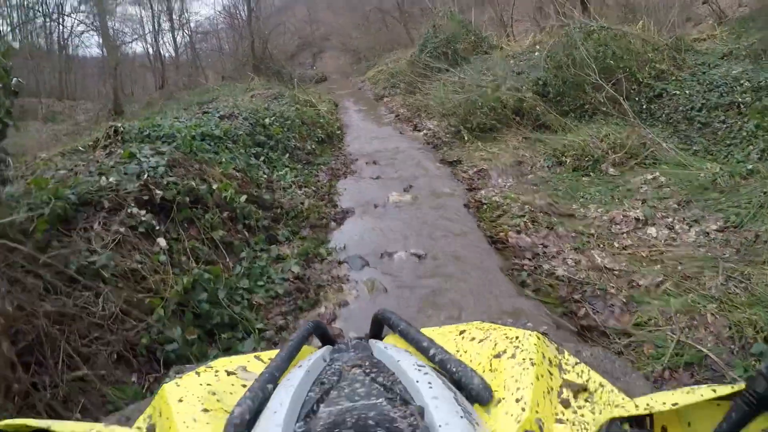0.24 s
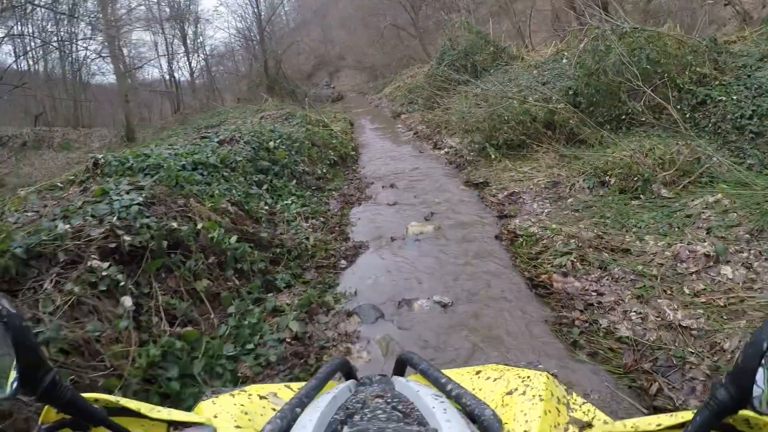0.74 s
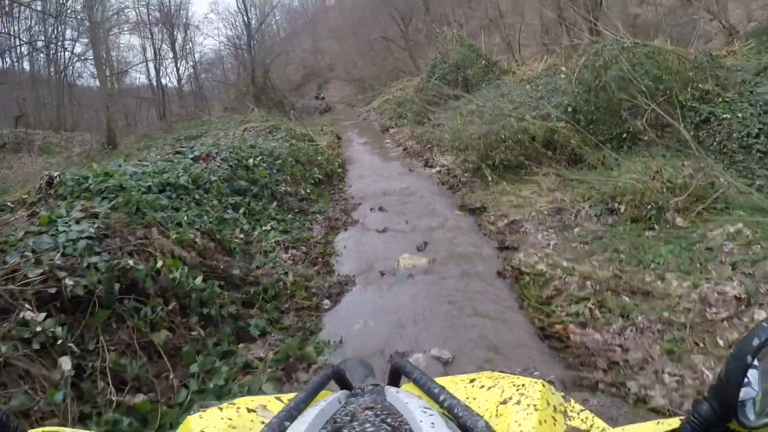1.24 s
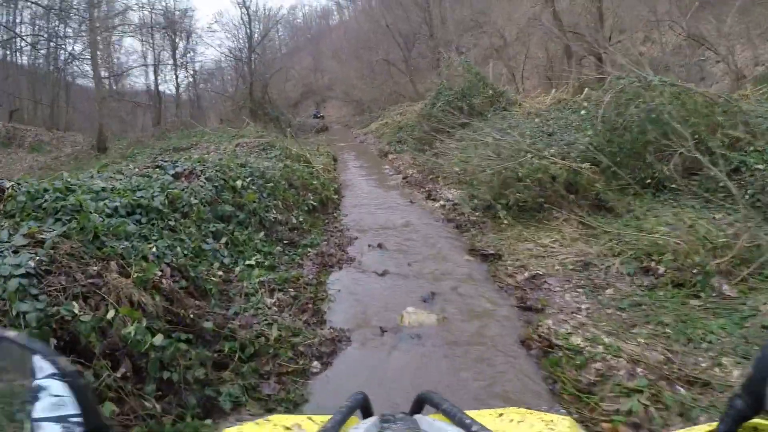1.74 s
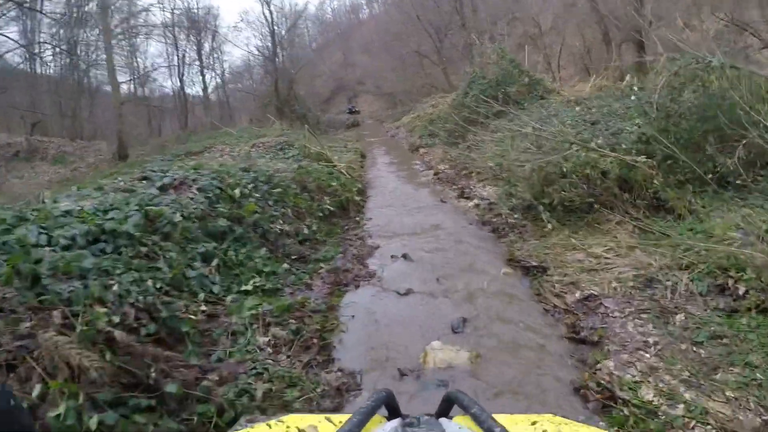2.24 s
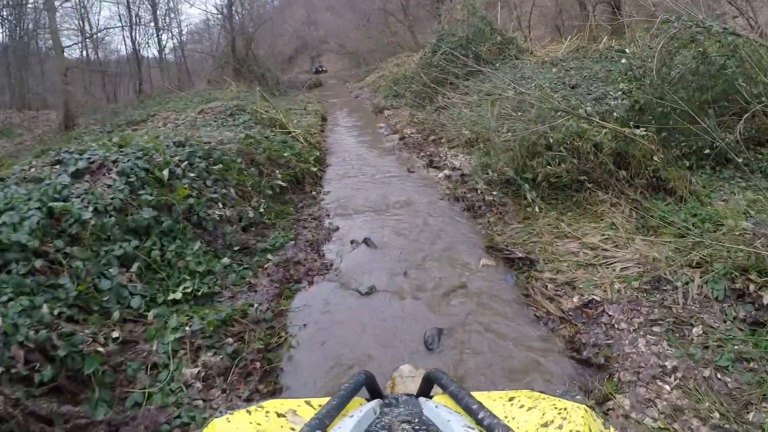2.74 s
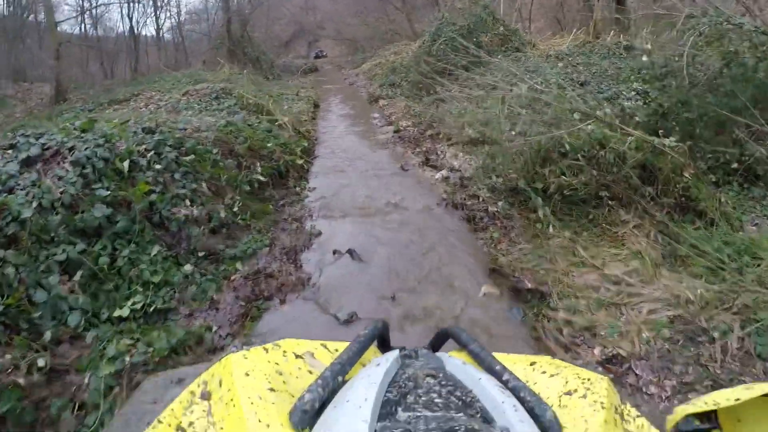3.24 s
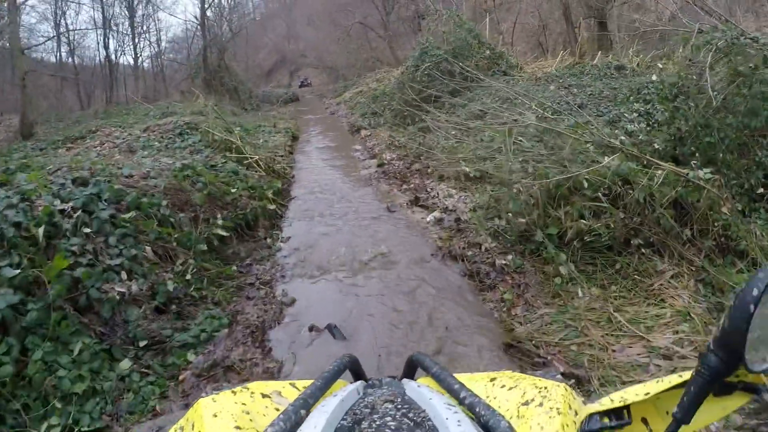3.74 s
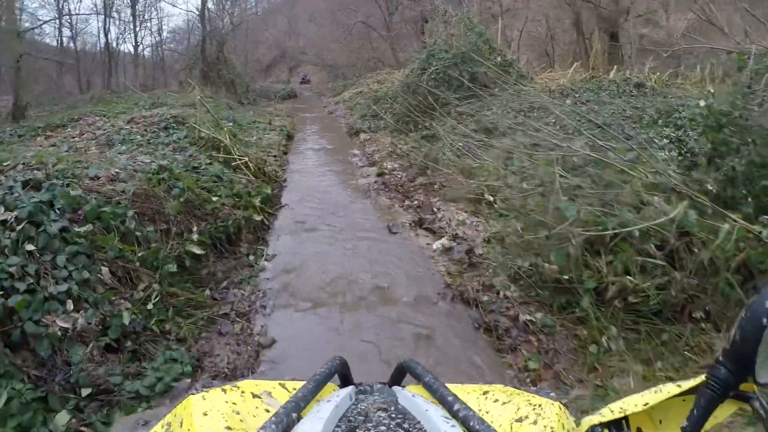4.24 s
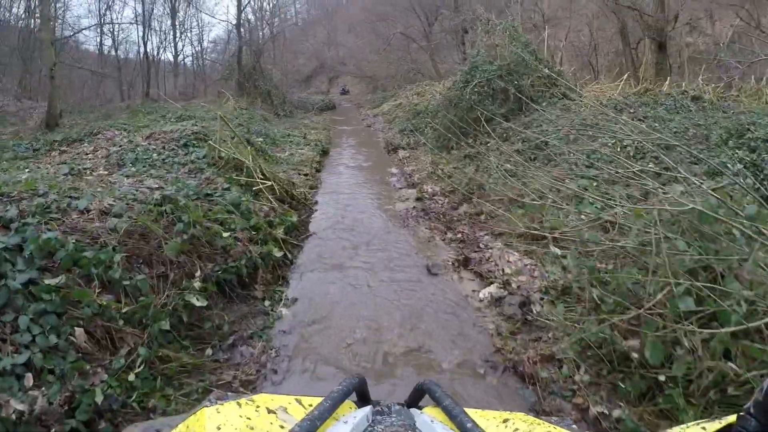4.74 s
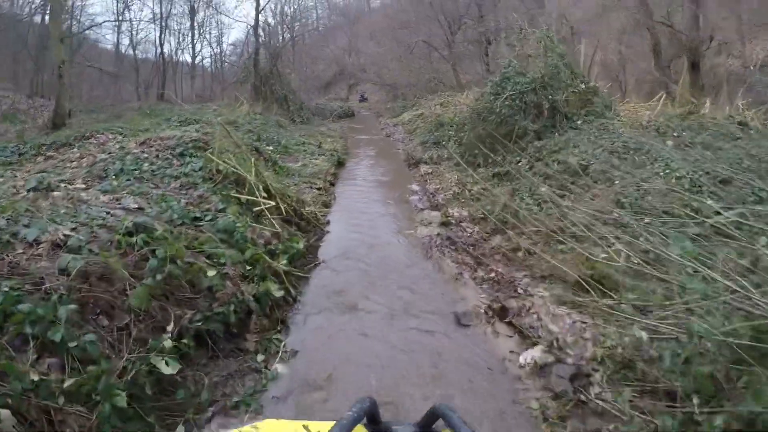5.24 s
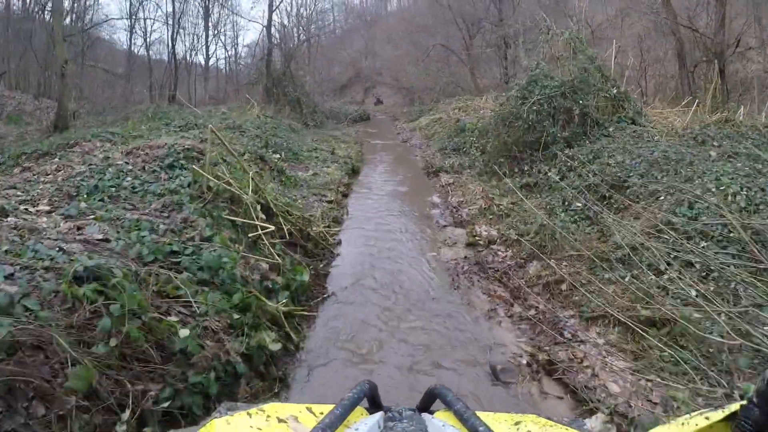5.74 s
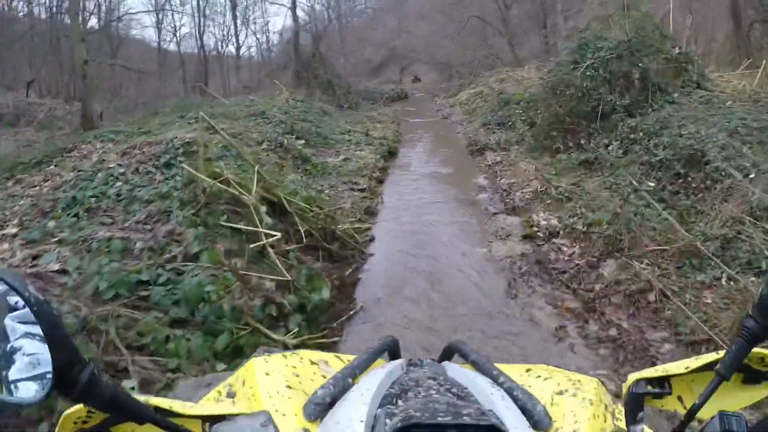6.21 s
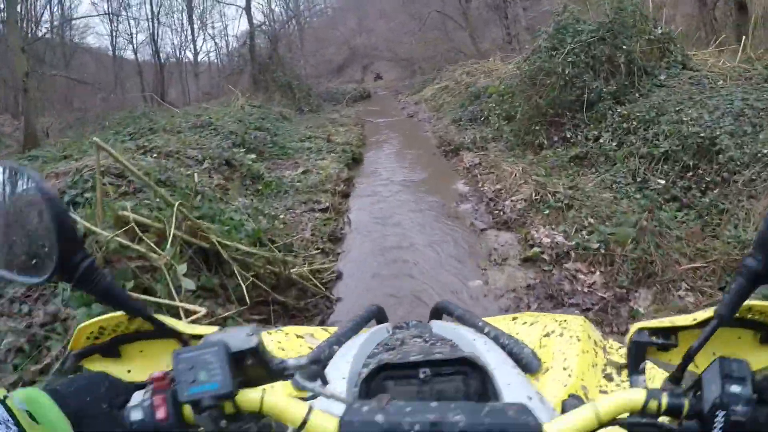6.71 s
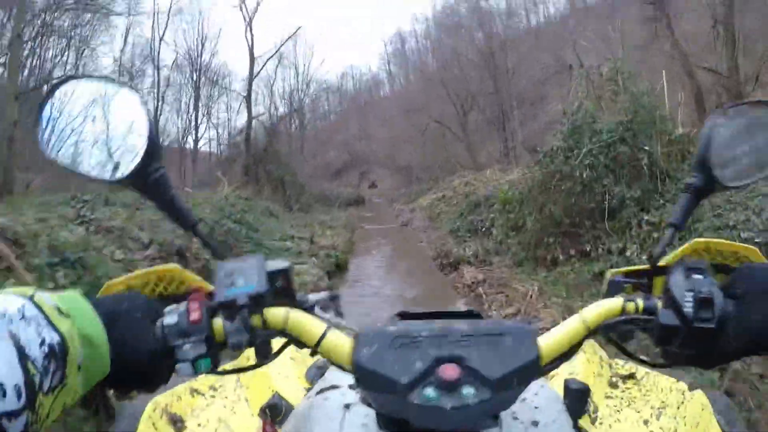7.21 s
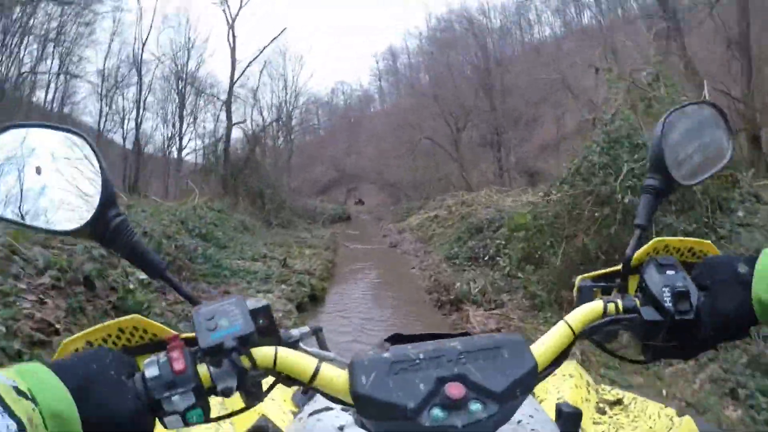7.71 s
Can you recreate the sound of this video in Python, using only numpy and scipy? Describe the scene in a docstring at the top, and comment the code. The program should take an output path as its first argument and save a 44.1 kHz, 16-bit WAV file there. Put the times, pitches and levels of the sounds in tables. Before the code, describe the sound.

A low quad bike engine drones throughout, rising and dipping with the throttle as the tyres push through shallow water with a soft, spattering hiss. Tinny rattles, brief faint whines and irregular thumps come from the machine as it jolts along. Towards the end the engine pitch rises and the rattling gets busier. The microphone rides with the driver, so everything sounds close and boxy, with some wind rumble.

```python
"""Quad bike in a muddy stream.

A twin-cylinder quad bike crawls through shallow water, heard by a cased camera on the rider.
Engine harmonics boom in the rider's gear; clatter, spray and knocks force the case's resonances.
The drivetrain whines, a loose panel rings in damped vibration and bumps excite the chassis,
while jolts and wind buffet the two microphone ports separately."""
import sys
import numpy as np
from scipy import signal
from scipy.fft import rfft, irfft, next_fast_len
from scipy.io import wavfile
from scipy.ndimage import uniform_filter1d

SR = 44100
rng = np.random.default_rng(int(sys.argv[2]) if len(sys.argv) > 2 else 0)


def put_to_file(sound):
    """Save the sound as 16-bit audio at rate SR, in the file named by the first command-line argument."""
    columns = np.atleast_2d(sound).T  # one column per channel
    safe = np.clip(columns, -1, 1)
    whole_steps = np.round(safe * 32767)
    wavfile.write(sys.argv[1], SR, whole_steps.astype(np.int16))


N = 351477
TIME = np.arange(N) / SR
SIZE = next_fast_len(N + SR // 4)
FREQ = np.arange(1, SIZE // 2 + 2) * SR / SIZE


def undb(db):
    return 10 ** (np.asarray(db) / 20)


def unit(x):
    return x / np.sqrt(np.mean(x ** 2))


def curves(table):
    """Linear interpolation of each column over the times in the first."""
    s, *columns = np.transpose(table)
    return [np.interp(TIME, s, c) for c in columns]


def waver(rate):
    """Random modulation: smoothed steps, rate per second, with unit RMS."""
    k = int(SR / rate)
    steps = np.repeat(rng.standard_normal(N // k + 1), k)
    return unit(uniform_filter1d(uniform_filter1d(steps, k), k)[:N])


def mode(hz, width):
    """Second-order resonance with unit gain at its centre."""
    return 1 / (1 + 1j * (FREQ / hz - hz / FREQ) * hz / width)


def resonate(modes, drive, flicker_db, rate):
    """Modal superposition: noise under the drive envelope forces each mode, heard at two ports."""
    out, power = 0, 0
    for hz, width, db, pan_db, lag, share in modes:
        force = rng.standard_normal((3, N)) * drive * undb(flicker_db * waver(rate))
        common, left, right = rfft(force, SIZE)
        ring = undb(db) * mode(hz, width / np.sqrt(2 ** (1 / 4) - 1)) ** 4  # keeps the half-power width
        left = np.sqrt(share) * common * np.exp(-1j * lag) + np.sqrt(1 - share) * left
        right = np.sqrt(share) * common + np.sqrt(1 - share) * right
        out = out + ring * [undb(pan_db) * left, right]
        power += np.mean(np.abs(ring) ** 2)
    return irfft(out, SIZE)[:, :N] / np.sqrt(power)


# Each row: time in seconds, four-stroke cycle rate in Hz, relative levels of orders 2, 3 and 5 in dB,
# left minus right in dB.
REVS = [(0.05, 15.5, -23.5, -28, -27.5, 2), (0.09, 17.3, -16.5, -33, -29, -16),
        (0.29, 14.5, -33, -43, -29, -4.5), (0.69, 13.7, -33, -54, -34.5, -1),
        (0.75, 15, -51, -33, -34.5, -6), (0.97, 18.7, -23.5, -46, -25.5, -10),
        (1.06, 18.8, -17, -32, -26.5, -7), (1.28, 17.2, -23.5, -35, -29.5, -11),
        (1.43, 17.2, -26, -41, -37.5, -16), (1.61, 18, -31, -49, -27, -13),
        (1.83, 19.4, -28, -24.5, -47, -9), (1.9, 19.3, -28, -35, -34, -5),
        (2.01, 19.2, -29, -28, -30.5, -4), (2.18, 17.9, -21.5, -38, -32.5, -11),
        (2.29, 17, -20.5, -42, -41, -6.5), (2.67, 15.3, -40, -40, -32, -8),
        (2.89, 19.8, -22.5, -47, -25, -11), (3.0, 22.6, -26, -40, -36, -1),
        (3.22, 20.3, -23.5, -38, -31.5, -5.5), (3.53, 16.5, -21, -51, -33, -8),
        (3.68, 17.0, -19.5, -44, -32, -7), (3.9, 18.2, -19.5, -41, -26, -14),
        (3.97, 18.1, -23, -38, -28.5, -6), (4.14, 17.2, -23, -45, -32, -12.5),
        (4.3, 16.9, -30, -50, -32, -5), (4.52, 18.9, -19.5, -45, -26.5, -22),
        (4.82, 17.1, -17.5, -29, -36, -13), (5.0, 18.5, -16, -46, -28.5, -17),
        (5.11, 21.2, -19.5, -35, -24, -11), (5.18, 20.8, -27, -54, -36.5, -5),
        (5.29, 20.1, -24, -30, -30, -7.5), (5.5, 20.7, -30.5, -37, -28.5, -6),
        (5.66, 21.8, -28.5, -39, -35, -7), (5.92, 24.1, -32.5, -31, -37.5, -1.5),
        (6.01, 23.6, -24.5, -34, -40.5, -2), (6.21, 23.2, -31, -31, -50, -3),
        (6.45, 25.1, -26.5, -29, -43, -5.5), (6.65, 24, -32.5, -30, -42, -8.5),
        (6.9, 26.9, -31, -27, -39, -12.5), (7.2, 26.2, -31, -28, -40.5, -16),
        (7.37, 26.1, -34, -25.5, -36, -8.0), (7.57, 26.3, -28, -25, -36, -14),
        (7.75, 26.6, -31, -30.5, -37, -12), (7.95, 29, -33, -29.5, -54, -5)]
# Each row: time in seconds, relative level of order 4 in dB.
FOURTH_ORDER = [(0.05, -50), (0.5, -40), (0.95, -40), (1.3, -36), (1.7, -40), (2.05, -31), (2.3, -42),
                (2.7, -43), (3.0, -36), (3.2, -29), (3.45, -42), (3.8, -35), (4.1, -33), (4.3, -42),
                (4.5, -34), (4.75, -34), (5.0, -42), (5.25, -36), (5.4, -30), (5.6, -32), (5.9, -43),
                (6.15, -40), (6.5, -40), (6.8, -34.5), (7.05, -31), (7.3, -39), (7.6, -37), (7.95, -42)]
# Orders 2 to 5. Each row: gain in dB, further gain on the left in dB, left lag in radians.
BOOM_ORDERS = [(8, 2.5, -1.64), (7.5, -1.5, -0.32), (6, -12.5, -1.2), (7.5, -1.5, 1.48)]
# Each row: multiple of the cycle rate, left and right levels in dB at a cycle rate of 20 Hz.
WEAK_ORDERS = [(6, -46, -42), (7, -50, -43), (8, -54, -45.5), (9, -60, -52), (10, -57, -49.5),
               (11, -55, -54), (12, -50.5, -53.5), (14, -58, -54)]
def engine():
    """Harmonics of an uneven firing cycle, jittered in timing and strength. Also returns its phase."""
    hz, second_db, third_db, fifth_db, pan_db = curves(REVS)
    levels_db = second_db, third_db, curves(FOURTH_ORDER)[0], fifth_db
    phase = 2 * np.pi * np.cumsum(hz) / SR + 0.035 * waver(15)
    ports = np.zeros((2, N))
    for k, (db, left_db, lag) in enumerate(BOOM_ORDERS):
        level_db = db + levels_db[k] + 2.2 * waver(11)
        angle = (k + 2) * phase + k * k
        ports[0] += undb(level_db + pan_db + left_db) * np.sin(angle - lag)
        ports[1] += undb(level_db) * np.sin(angle)
    for multiple, *db in WEAK_ORDERS:
        wave = undb(2.7 * waver(3.5)) * np.sin(multiple * phase + rng.uniform(0, 2 * np.pi, (2, 1)))
        ports += undb(db)[:, None] * wave * (hz / 20) ** 0.82
    return ports, phase


# Case modes. Each row: frequency in Hz, bandwidth in Hz, relative level on the right in dB,
# left minus right in dB, left lag in radians, share of power common to both ports.
CASE_LOW = [(1011, 119, 0, -3, -3, 0.96), (1134, 58, -2.1, -2, -1.5, 0.97)]
CASE_MID = [(1286, 210, -9, 0.5, -3, 0.96), (1410, 154, -5, -10.5, -0.8, 1),
            (1678, 317, 0, -2.5, -0.9, 0.82), (2094, 123, -4.5, 1, -1, 1),
            (2297, 295, -2.5, -9, 0.77, 0.93), (2640, 520, -17, 2, 2.5, 0.44)]
def clatter(phase, clatter_db, knock):
    """Forced vibration of the case by knocks and by valves and gas, which throb twice a cycle."""
    throb = 1 + 0.13 * np.cos(2 * phase)
    mid_drive = undb(clatter_db + 2.5) * throb + undb(8) * knock
    low_drive = undb(0.61 * clatter_db - 25) * throb + undb(2) * knock  # grows less with load
    mid = resonate(CASE_MID, mid_drive, flicker_db=0.5, rate=14)
    return mid + resonate(CASE_LOW, low_drive, flicker_db=2, rate=9)


# Each row: one mode of the mount, with columns as for the case.
MOUNT_MODES = [(578, 47, -4, -2.5, -3, 0.99), (646, 277, -7.5, -0.5, -3, 0.94)]
def mount(buffet_db, clatter_db):
    """Forced resonance of the camera mount, shaken by the buffeting and the engine."""
    drive = undb(0.62 * buffet_db + 0.34 * clatter_db - 5)
    return resonate(MOUNT_MODES, drive, flicker_db=2.5, rate=7)


# Each row: one treble mode of the case, with columns as for its lower modes.
CASE_HIGH = [(2968, 264, 12, -7, -0.14, 0.54), (3455, 620, 4.5, -2.5, 0.7, 0.52),
             (4050, 670, 4, -4.5, 1, 0.34), (4524, 300, 1, 1, 3, 0.29), (5270, 930, -1.5, -2.5, 3.5, 1),
             (5800, 860, 1, -1, 1.35, 0.52), (6300, 510, 1.5, -2.5, 3, 1),
             (7220, 1480, 0.5, 0.5, 3.5, 0.33), (7800, 430, 1.5, -10, 2.5, 0.43),
             (8650, 1500, -4.5, -4.5, 0, 0.29), (9880, 1190, -12, 1, -1, 1),
             (12500, 1300, -19.5, -0.5, -14, 0.7)]
def spray(level_db, drops_per_s=240, decay_s=0.011):
    """Impact noise: water from the tyres rings the case, a few drops much louder than the rest."""
    hits = (rng.random(N) < drops_per_s / SR) * undb(4.3 * np.minimum(rng.exponential(size=N), 5))
    drops = unit(signal.lfilter([1], [1, -np.exp(-1 / (decay_s * SR))], hits))
    return resonate(CASE_HIGH, undb(level_db + 6.5) * (1 + 0.31 * drops), flicker_db=1.2, rate=10)


# Each row: frequency in Hz, relative spectral density at that port in dB.
LEFT_SPECTRUM = [(50, -8), (100, -7), (180, -20.5), (240, -23.5), (320, -12.5), (450, -22), (600, -48)]
RIGHT_SPECTRUM = [(45, -9), (100, -14), (150, -20), (200, -23), (320, -31.5), (450, -34.5), (600, -68)]
def buffet(level_db):
    """Turbulent pressure and jolts, uncorrelated at the two ports, over a slow heave."""
    pan_db = -5 + waver(5.5)
    ports = []
    for spectrum, side, heave_db in (LEFT_SPECTRUM, .5, -26.5), (RIGHT_SPECTRUM, -.5, -23):
        hz, colour_db = np.transpose(spectrum)
        colour = undb(np.interp(np.log(FREQ), np.log(hz), colour_db, right=-90))
        colour *= (FREQ / hz[0]).clip(0, 1) ** 2
        colour /= np.sqrt(np.mean(colour ** 2 * (FREQ > 130) * (FREQ < 400)))
        noise = rng.standard_normal(N) * undb(level_db + 1.5 + side * pan_db + 2 * waver(20))
        gusts = irfft(rfft(noise, SIZE) * colour, SIZE)[:N]
        heave = irfft(rfft(rng.standard_normal(N), SIZE) * mode(15.54, 28.2) ** 3, SIZE)[:N]
        ports.append(gusts + unit(heave) * undb(heave_db + 1.5 * waver(1.3)))
    return np.array(ports)


# Each row: start and end in seconds, first and last frequency in Hz, level in dB.
WHINES = [(0.02, 0.157, 2120, 2090, -38.5), (1.193, 1.346, 1342, 1306, -37.5),
          (1.567, 1.76, 1332, 1346, -39), (4.45, 4.63, 1344, 1306, -40), (5.055, 5.401, 876, 868, -42),
          (5.459, 5.8, 882.4, 948, -39), (6.443, 6.759, 1090, 1271, -39.5),
          (6.561, 6.804, 2190, 2062, -31.5)]
def whines():
    """Gliding drivetrain tones; the case shifts their phase at the left port as it does the clatter's."""
    mode_hz, _, _, _, mode_lag, _ = np.transpose(CASE_LOW + CASE_MID)
    out = 0
    for start, end, from_hz, to_hz, db in WHINES:
        progress = np.clip((TIME - start) / (end - start), 0, 1)
        hz = (from_hz + (to_hz - from_hz) * progress) * (1 + 0.009 * waver(40))
        lag = np.array([[np.interp(from_hz, mode_hz, mode_lag)], [0]])
        swell = undb(db) * np.sqrt(np.sin(np.pi * progress).clip(0))
        out = out + swell * np.sin(2 * np.pi * np.cumsum(hz) / SR - lag)
    return out * undb(2.5 * waver(50)) * np.array([[.95], [1]])


# Each row: start in seconds, level in dB, frequency in Hz, time to decay by 60 dB in seconds.
PINGS = [(0.0358, -22.5, 2080, 0.17), (0.2066, -24, 1660, 0.087), (0.387, -23, 1710, 0.12),
         (0.459, -16.5, 1570, 0.035), (0.578, -22.5, 1674, 0.12), (0.6397, -25, 1680, 0.18),
         (0.7042, -21, 1670, 0.043), (0.715, -21, 1670, 0.13), (0.7474, -18, 1560, 0.053),
         (0.7895, -18, 1652, 0.076), (0.854, -16, 1630, 0.09), (0.8979, -17, 1642, 0.1),
         (0.906, -13, 1651, 0.062), (0.936, -16, 1610, 0.049), (0.9652, -22.5, 1563, 0.14),
         (1.1014, -23, 1514, 0.078), (1.4268, -25, 1630, 0.13), (2.0283, -20, 1672, 0.07),
         (2.6473, -21.5, 1620, 0.11), (2.716, -16, 1626, 0.079), (2.7805, -19, 1638, 0.13),
         (2.9362, -27, 2062, 0.086), (3.0036, -19, 1800, 0.05), (3.0686, -25, 1730, 0.12),
         (3.189, -22.5, 1772, 0.089), (3.5758, -17.5, 1772, 0.048), (4.138, -22, 1557, 0.071),
         (4.1949, -19, 1600, 0.048), (4.3066, -24, 2010, 0.086), (4.35, -21.5, 1630, 0.07),
         (4.466, -22, 1597, 0.08), (4.548, -24, 1540, 0.077), (4.592, -22.5, 1560, 0.075),
         (4.7078, -23, 1576, 0.096), (4.7697, -26.5, 1580, 0.14), (4.826, -29, 1570, 0.09),
         (5.006, -31, 1570, 0.11), (5.08, -23, 1838, 0.11), (5.3335, -24, 1592, 0.081),
         (5.7106, -19, 1638, 0.055), (6.3732, -20, 1620, 0.11), (6.599, -32, 1662, 0.081),
         (6.817, -18, 1824, 0.059), (6.95, -16, 1718, 0.13), (7.028, -19, 1634, 0.08),
         (7.07, -16, 1706, 0.1), (7.193, -21, 1735, 0.1), (7.312, -23, 1690, 0.12),
         (7.435, -19, 1816, 0.08), (7.53, -16, 1718, 0.097), (7.58, -15, 1663, 0.099),
         (7.659, -20, 1712, 0.11), (7.721, -16, 1660, 0.089), (7.756, -14.5, 1700, 0.081),
         (7.794, -23, 1600, 0.082), (7.877, -23, 1760, 0.1), (7.92, -20, 1745, 0.098)]
def panel_pings(clatter_db, per_s=51):
    """Damped vibration of a loose panel: listed pings, and small random ones that follow the clatter."""
    centre_hz = np.minimum(1613 + 24.1 * (curves(REVS)[0] - 17), 1719)  # rises with the revs
    pings = list(PINGS)
    for when, force, detune, decay in rng.random((int(per_s * N / SR), 4)):
        i = int(when * N)
        hz = centre_hz[i] + 200 * (detune - .5)
        pings.append((when * N / SR, clatter_db[i] + 2 + 4.7 * force, hz, 0.04 + 0.083 * decay))
    out, age = np.zeros(N + SR, complex), np.arange(SR // 4) / SR
    attack = np.sin(np.minimum(age / 0.0035, 1) * np.pi / 2) ** 2
    for s, db, hz, t60 in pings:
        beat = 1 + 0.25 * np.exp(2j * np.pi * (rng.uniform(118, 122) * age + .5))  # a second, close mode
        note = attack * np.exp(2j * np.pi * hz * age - np.log(1000) * age / t60)
        out[int(s * SR):][:len(age)] += undb(db) * note * beat
    return np.imag(out[:N] * np.array([[undb(-7) * np.exp(1.3j)], [1]]))


# Each row: start in seconds, push level in dB, left minus right in dB, push length in seconds,
# relative level of the buffeting it stirs up in dB.
THUDS = [(0.261, -17, 6, 0.0069, -38), (0.467, -9, 0, 0.007, -36), (1.072, -16, 1, 0.0075, -36),
         (1.639, -31, -1.5, 0.0056, -41), (1.718, -18, -3, 0.012, -52), (1.825, -10.5, -4, 0.0057, -34),
         (2.044, -11, -4, 0.0079, -37), (3.056, -11, -13, 0.0066, -35), (3.197, -15, -4.0, 0.0053, -39),
         (3.625, -14, 0, 0.0051, -42), (3.729, -13, 8, 0.0023, -41), (4.282, -40, -2.0, 0.004, -43),
         (4.43, -34, -3.0, 0.0039, -36.5), (5.188, -20, 4, 0.0046, -37), (5.799, -29, -1.5, 0.0038, -34),
         (5.841, -8.5, -12, 0.01, -38), (5.911, -8, 0, 0.0055, -36.5), (6.175, -9, 1, 0.0054, -55),
         (6.427, -16.5, 15, 0.005, -42), (6.914, -6, 4, 0.0031, -29.5), (6.978, -11, 13, 0.0057, -32.5),
         (7.22, -37, -2.5, 0.0041, -38), (7.334, -30, -4, 0.0058, -36), (7.361, -18, -2, 0.002, -36),
         (7.4, -10, -12, 0.013, -43), (7.623, -35, -3.5, 0.004, -35)]
def thuds():
    """Pulse response: each soft push rings low in the rider's gear and briefly in the mount."""
    out = np.zeros((2, N + SR))
    for s, db, pan_db, length, _ in THUDS:
        push = np.hanning(int(length * SR))
        out[:, int(s * SR):][:, :len(push)] += undb(db + np.array([[pan_db], [-pan_db]]) / 2) * push
    gear = mode(76, 133) ** 2
    mount_ring = undb(-12) * mode(640, 300) + undb(-4) * mode(620, 50) * np.array([[-1], [1]])
    return irfft(rfft(out[:, :N], SIZE) * (gear + mount_ring), SIZE)[:, :N]


# Each row: time in seconds, relative level of the buffeting between thuds in dB.
BUFFET_BASE = [(0.1, -43), (1.42, -43.5), (1.66, -38.5), (2.1, -46), (2.77, -42.5), (2.9, -40), (4.88, -44),
               (5.05, -42), (7.9, -38.5)]
def turbulence_db(rise_s=0.026, fall_s=0.029):
    """Incoherent addition: a surge around each thud adds in power to the slow base of buffeting."""
    power = undb(curves(BUFFET_BASE)[0]) ** 2
    for s, *_, db in THUDS:
        surge = np.exp(-np.abs(TIME - s) / np.where(TIME < s, rise_s, fall_s))
        power += (undb(db) * surge) ** 2
    return 10 * np.log10(power)


# Each row: start in seconds, relative level in dB, treble offset in dB, decay constant in seconds.
KNOCKS = [(0.408, -43, -22, 0.019), (0.662, -50, -24, 0.0056), (0.87, -42, -25, 0.006),
          (0.896, -29.5, -20.5, 0.0083), (1.077, -35.5, -26, 0.0072), (2.025, -35, -28, 0.0098),
          (2.709, -61, -28, 0.031), (2.933, -40, -20, 0.006), (3.884, -49, -24, 0.0059),
          (3.992, -34, -25, 0.0081), (5, -39.5, -21, 0.011), (5.748, -50, -21, 0.042),
          (6.444, -47, -30, 0.006), (6.618, -50, -23, 0.0086), (7.125, -45, -14, 0.012)]
def knock_envelope(treble, rise_s=0.0015):
    """Exponential decay of the rattle after each jolt that shakes the whole case."""
    out = np.zeros(N)
    for s, db, treble_db, decay_s in KNOCKS:
        age = np.maximum(TIME - s, 0)
        out += np.minimum(age / rise_s, 1) * undb(db + treble * treble_db) * np.exp(-age / decay_s)
    return out


def knock_treble(tilt_db_per_octave=4):
    """Shock excitation: knocks ring the upper case modes brighter than the spray does."""
    bright = [(hz, width, db + tilt_db_per_octave * np.log2(min(hz, 8000) / 3000), *ports)
              for hz, width, db, *ports in CASE_HIGH]
    return resonate(bright, undb(22.5) * knock_envelope(treble=True), flicker_db=1, rate=10)


# Each row: time of the peak in seconds, level in dB, Gaussian spread in seconds.
BUMPS = [(0.903, -43, 0.0087), (1.815, -45, 0.012), (2.035, -46, 0.01), (6.92, -44, 0.01),
         (6.985, -45, 0.0078), (7.335, -43, 0.012), (7.37, -40, 0.0079)]
# Each row: one mode of the chassis, with columns as for the case.
CHASSIS_MODES = [(440, 240, 2, -2, 0.59, 0.87), (750, 510, -1, -2, -0.22, 1),
                 (1060, 170, -7, -2, -1.3, 0.97)]
def bumps():
    """Heavily damped resonance: brief swells of noise draw dull scuffs from the chassis."""
    drive = sum(undb(db) * np.exp(-.5 * ((TIME - s) / spread) ** 2) for s, db, spread in BUMPS)
    return resonate(CHASSIS_MODES, drive, flicker_db=0, rate=10)


# Each row: time in seconds, relative clatter level in dB, offset from it for the spray in dB.
CHURN = [(0.06, -35.5, -17), (0.3, -38, -16.5), (0.41, -38.5, -15), (0.78, -38.5, -15.5),
         (0.92, -37.5, -13.5), (0.96, -34, -17.5), (1.29, -36.5, -17), (1.97, -36.5, -15.5),
         (2.3, -39.5, -16), (2.61, -38, -17), (2.7, -39.5, -17), (2.73, -36, -16.5), (2.9, -34, -16.5),
         (2.99, -34.5, -17), (3.51, -36.5, -16), (3.58, -36, -15), (4.12, -37, -17.5), (4.43, -35.5, -17.5),
         (4.78, -37, -15.5), (5.05, -36.5, -15.5), (5.16, -35, -17), (5.5, -36, -15.5),
         (5.64, -36.5, -16.5), (5.76, -34, -15.5), (5.93, -33, -15.5), (6.25, -33.5, -16),
         (6.48, -32.5, -15.5), (6.72, -30.5, -14.5), (6.9, -29.5, -17.5), (7.12, -28.5, -16.5),
         (7.3, -30.5, -15.5), (7.49, -30, -17), (7.71, -29.5, -16.5), (7.95, -29, -17)]
def scene():
    """Linear superposition of all sources at the left and right ports."""
    clatter_db, spray_offset_db = curves(CHURN)
    buffet_db = turbulence_db()
    boom, phase = engine()
    body = clatter(phase, clatter_db, knock_envelope(treble=False)) + mount(buffet_db, clatter_db)
    treble = spray(clatter_db + spray_offset_db) + knock_treble()
    return boom + body + treble + whines() + panel_pings(clatter_db) + buffet(buffet_db) + thuds() + bumps()


def record(dry):
    """Band limiting: the camera's low-pass filter cuts the top of the treble."""
    return signal.sosfilt(signal.ellip(8, .2, 70, 14300, fs=SR, output="sos"), dry)


dry = scene()
out = record(dry)
put_to_file(out)
```